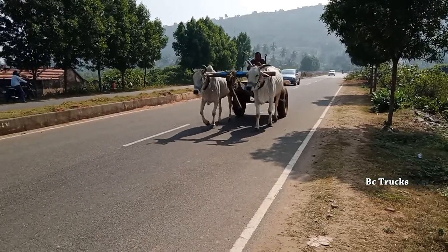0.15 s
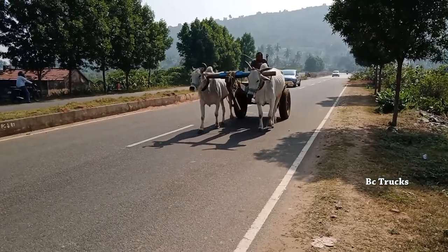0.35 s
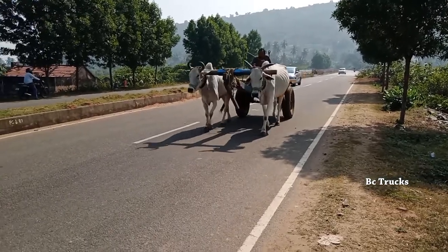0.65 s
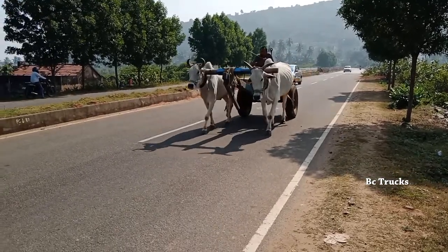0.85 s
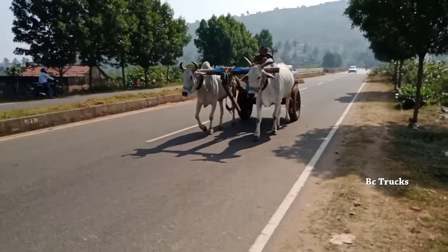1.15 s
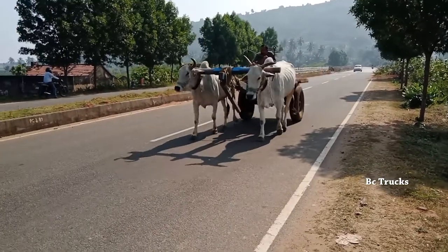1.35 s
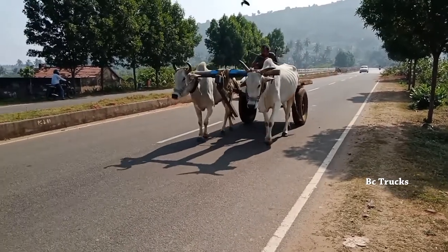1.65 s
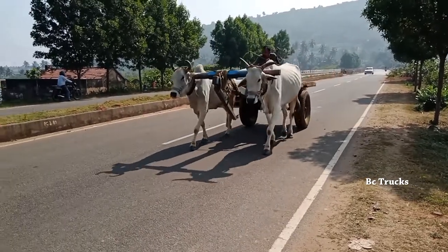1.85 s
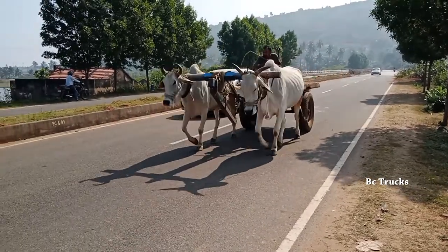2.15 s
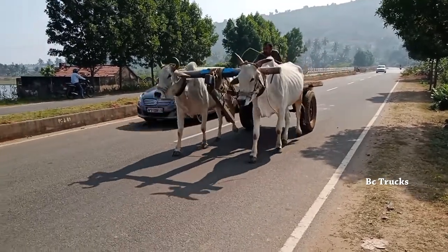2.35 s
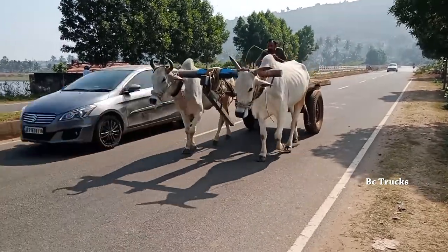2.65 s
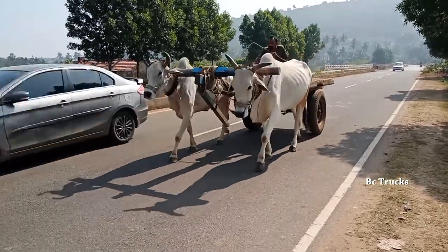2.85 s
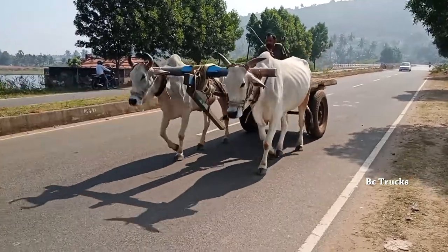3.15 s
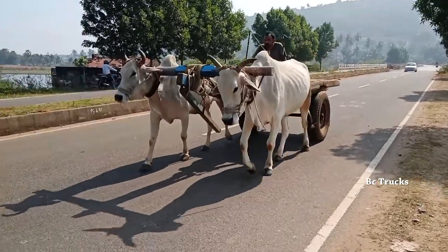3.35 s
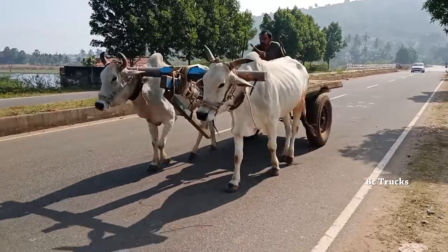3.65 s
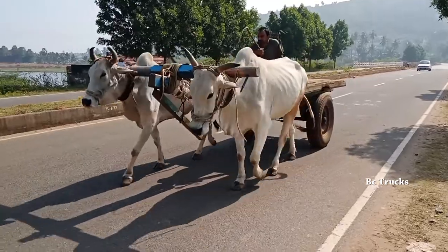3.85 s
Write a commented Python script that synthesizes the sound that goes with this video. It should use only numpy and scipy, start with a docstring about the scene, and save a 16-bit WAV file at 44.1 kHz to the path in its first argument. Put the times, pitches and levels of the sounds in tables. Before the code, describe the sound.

Ox hooves clack on a road, drawing a rumbling cart as a car rushes past.

```python
"""Two oxen draw a cart along a country highway towards a microphone on the verge as a car overtakes.
Each hoof impact excites a sharp crack, a dull knock and a spray of crushed grit; iron parts ring in
damped modes, thin squeaks fall in pitch, and the cart bed rumbles and bumps. The car's tyre roar is
directional: it swells from ahead, broadens alongside and leaves a hiss behind.
Far traffic and brief puffs of wind lie underneath."""
import sys
import numpy as np
from scipy import signal
from scipy.fft import rfft, irfft
from scipy.io import wavfile
from scipy.ndimage import uniform_filter1d

SR = 44100
rng = np.random.default_rng(int(sys.argv[2]) if len(sys.argv) > 2 else 0)


def dump(signal):
    """Clip the signal to [-1, 1] and save it as 16-bit WAV at the path in sys.argv[1]."""
    limited = np.clip(np.atleast_2d(signal).T, -1, 1)
    pcm = np.round(limited * 32767).astype(np.int16)
    wavfile.write(sys.argv[1], SR, pcm)


N = 176400

# hoof strikes and scuffs: start_s, crack_db, knock_db, grit_decay_s
HOOF_STRIKES = [(0.049, -46, -56, .014), (.064, -45, -46, .012), (.131, -53, -48, .016),
                (0.3, -40, -52, .012), (.308, -32.5, -43, 0.0057), (0.332, -48, -42.5, .04),
                (.361, -47, -54, .008), (.633, -45, -43, 0.013), (0.641, -52, -46, 0.032),
                (.763, -59, -51, .012), (.797, -32.5, -44, 0.0074), (.807, -55, -38, .014),
                (0.891, -40.5, -62, .01), (.899, -37, -60, .004), (0.91, -46, -46, 0.018),
                (0.955, -59, -44, .014), (1.120, -55, -52, 0.011), (1.146, -53, -63, .006),
                (1.169, -55, -47, .02), (1.184, -43, -34, 0.013), (1.222, -35.5, -48, 0.0081),
                (1.317, -29, -33.5, 0.0053), (1.325, -37, -44, .012), (1.441, -40.5, -51, 0.026),
                (1.475, -41, -40.5, 0.0066), (1.571, -54, -51, .006), (1.647, -36, -33.5, .008),
                (1.793, -30.5, -36, 0.0076), (1.802, -48, -37.5, 0.011), (2.052, -31, -38.5, .011),
                (2.209, -41, -44, .01), (2.236, -46, -47, 0.032), (2.326, -34.5, -35, .016),
                (2.346, -35.5, -33.5, 0.032), (2.630, -36, -40, 0.021), (2.812, -35, -30, 0.018),
                (2.821, -43, -28.5, .008), (2.922, -27, -34, 0.027), (2.974, -34, -44, .006),
                (3.014, -27.5, -47, 0.012), (3.229, -28, -29, 0.0071), (3.692, -32, -24.5, .02),
                (3.800, -30, -35, 0.027), (3.854, -28.5, -26.5, .014)]
# spectral shapes of the sharp crack and the dull knock: frequency_hz, relative_db
CRACK_SHAPE = [(1500, -60), (3500, -31), (6000, -3.5), (8500, 6), (11000, 2.5), (15000, -4.5)]
KNOCK_SHAPE = [(80, -5), (200, -24), (500, 8), (1400, 13), (2400, 8), (4000, 12.5), (6000, 6), (9000, 2),
               (15000, -9)]
# hooves sliding on the road: centre_s, half_length_s, level_db
HOOF_DRAGS = [(0.676, 0.033, -58), (0.937, 0.025, -58), (1.123, 0.016, -53.5), (1.22, 0.055, -54),
              (1.472, 0.03, -49.5), (1.54, 0.038, -63), (2.257, 0.05, -61), (2.403, 0.092, -48.5)]
# spectral shape of sliding friction: frequency_hz, relative_db
FRICTION_SHAPE = [(1200, -15), (3000, -3), (4000, 8.5), (4700, -4), (5300, 0), (6300, -4.5), (8000, 2),
                  (15000, -25)]
# clinks of iron: start_s, pitch_hz, level_db
IRON_CLINKS = [(.049, 11650, -27), (0.049, 6800, -40), (0.615, 7450, -25), (1.285, 11500, -39),
               (1.293, 11000, -36), (1.77, 7450, -20), (1.821, 11800, -39), (1.852, 15100, -35),
               (1.888, 11100, -27), (2.653, 7480, -21.5), (2.925, 7460, -21)]
# modes of the iron: frequency_ratio, relative_db, decay_s
IRON_MODES = [(1.001, 1, 0.0026), (1.34, -25, .008)]
# thin squeaks: start_s, length_s, from_hz, to_hz, level_db
SQUEAK_GLIDES = [(0.18, .04, 7200, 5800, -60), (0.618, 0.1, 7400, 5920, -52),
                 (1.157, 0.033, 6900, 6630, -51), (3.687, 0.054, 6140, 5930, -33.5)]
# rumble of wheels and cart bed, before the approach gain: frequency_hz, density_db
RUMBLE_SPECTRUM = [(30, -97), (75, -75), (160, -74), (260, -86.5), (600, -105), (2000, -130)]
# bumps of the cart bed: start_s, pitch_hz, level_db
BED_BUMPS = [(1.225, 160, -41), (1.40, 171, -34.5), (1.766, 185, -33.5), (1.87, 89, -35),
             (1.961, 290, -32.5), (2.11, 200, -37), (2.281, 260, -30), (2.63, 228.8, -25.5),
             (2.72, 216, -27), (3.43, 262, -26), (3.719, 155, -27)]
# tyre and engine noise from the car's front, side and rear: frequency_hz, density_db
FRONT_SPECTRUM = [(60, -78.5), (150, -76.5), (280, -67.5), (430, -79.5), (570, -69.5), (830, -69),
                  (1060, -76), (1250, -73), (1520, -66.5), (1740, -77), (1980, -71.5), (2220, -82),
                  (2580, -81.5), (2900, -84), (4000, -84.5), (4700, -101.5), (6000, -96.5), (9000, -103),
                  (15000, -119)]
SIDE_SPECTRUM = [(50, -66), (110, -62), (170, -63), (290, -55.5), (480, -69.5), (850, -63.5), (1250, -63.5),
                 (1600, -60.5), (2000, -66.5), (2750, -65), (3200, -67), (4500, -70), (7200, -79.5),
                 (11000, -84), (15000, -105)]
REAR_SPECTRUM = [(60, -95.5), (240, -58.5), (380, -63), (560, -56.5), (900, -63), (1250, -59), (1450, -59),
                 (1750, -56), (2500, -68.5), (3700, -62), (6000, -68.5), (8000, -71.5), (11500, -72.5),
                 (15000, -85)]
# gain of the forward roar, stepping up as the car clears the cart: time_s, gain_db
FRONT_GAIN = [(0, -17.5), (.55, -16), (.88, -11.5), (1.15, -9.5), (1.5, -6), (1.8, -0.5), (2.06, 0),
              (2.16, 4), (2.33, 1.5), (2.52, 4.5), (2.8, 2.5), (3.1, -15), (4, -21)]
# surges of tread hum, the last one at a lower pitch: centre_s, half_length_s, pitch_hz, level_db
TREAD_SURGES = [(1.1, 0.27, 1394, -49), (2.18, 0.096, 1434, -42), (2.5, 0.088, 1434, -37.5),
                (3.555, 0.4, 1260, -42)]
# far traffic: frequency_hz, density_db
TRAFFIC_SPECTRUM = [(50, -69), (150, -81.5), (300, -89), (470, -94), (750, -91.5), (1050, -104),
                    (1300, -77), (1480, -81.5), (1720, -97), (1980, -75.5), (2200, -91.5), (2480, -81),
                    (2900, -97), (4000, -92), (4800, -106), (7200, -104), (10000, -112), (15000, -118)]
# puffs of wind: centre_s, half_length_s, level_db
WIND_PUFFS = [(0.15, 0.041, -41), (0.204, 0.034, -35.5), (0.308, 0.035, -37)]
# spectral shape of wind on the microphone: frequency_hz, relative_db
WIND_SHAPE = [(30, 11), (80, 9), (160, 5), (230, -11.5), (400, -40), (2000, -77)]
# response of the microphone port: frequency_hz, gain_db
PORT_RESPONSE = [(25, -32), (45, -26.5), (80, -8.5), (200, -0.5), (1100, 0), (1250, 8.5), (1450, 2),
                 (2000, 1), (2370, 7.5), (3050, -2.5), (3700, -5), (4150, -3), (4700, -8.5), (5500, 0),
                 (6050, 6), (6600, -0.5), (7250, 0.5), (8000, -9.5), (11500, -10), (13700, -13), (15100, 1)]

CONTACT_S, CRACK_DECAY_S, KNOCK_DECAY_S = 0.00077, 0.0035, 0.01
GRIT_DB, GRIT_FLICKER_DB, GRIT_FLICKER_PER_S = -6, 4.5, 110  # grit level is relative to the crack
GRAINS_PER_S, GRAIN_SPREAD_DB, GRAIN_RING_S = 5200, 5.5, 0.0007
HARNESS_DB, RUSTLE_DB, RUSTLE_PER_S = -62.5, 3, 45
CLINK_RISE_S, CLINK_JITTER, SCRAPE_DB, SCRAPE_DECAY_S = 0.0018, 0.022, -14, 0.0055
SQUEAK_WIDTH_HZ, TREAD_WIDTH_HZ = 450, 130
RUMBLE_LUMPS_DB, CRACKLE_DB, CRACKLE_UNEVEN_DB, APPROACH_DB_PER_S = 5.5, -73, 4, 0.5
BUMP_RISE_S, BUMP_DECAY_S, BUMP_JITTER = 0.0065, 0.023, 0.2017
SPEED_M_S, PASSES_S, LANE_M = 15.4, 3.138, 7.65  # car speed; time and distance of closest approach
SIDE_LEAD_M = 1.14  # the front tyres and the engine pass first
SIDE_FOCUS, REAR_FOCUS, REAR_FALLOFF = 3.39, 0.67, 0.82  # exponents: two beam shapes, one distance law
SWELL_DB, FLUTTER_DB = 1.22, 1.28  # slow and quick unevenness of road noise
SCATTER_DB, SCATTER_DELAY_S, SCATTER_DECAY_S = -10, 0.0082, 0.018


def hooves(t, stones):
    """Impact excitation: each brief contact gives a broadband crack, a knock and a spray of grit."""
    crack, grit, knock = np.zeros((3, N))
    for start, crack_db, knock_db, grit_decay_s in HOOF_STRIKES:
        settle = 1 - fade(t, start, CONTACT_S)
        crack += undb(crack_db) * settle * fade(t, start, CRACK_DECAY_S)
        grit += undb(crack_db + GRIT_DB) * settle * fade(t, start, grit_decay_s)
        knock += undb(knock_db) * settle * fade(t, start, KNOCK_DECAY_S)
    crack_noise = flicker(rng.standard_normal(N))
    knock_noise = flicker(rng.standard_normal(N))
    sharp = colour(crack * crack_noise + grit * stones, CRACK_SHAPE, keep_power=True)
    dull = colour(knock * knock_noise, KNOCK_SHAPE, keep_power=True)
    return sharp + dull


def gravel():
    """Superposition of random impacts: crushed stones of uneven size ring briefly at many pitches."""
    pitches = np.linspace(1500, 15500, 40)
    age, out = np.arange(256) / SR, np.zeros(N)
    for hz in pitches:
        hits = np.flatnonzero(rng.random(N) < GRAINS_PER_S / len(pitches) / SR)
        sizes, ticks = rng.standard_normal(N)[hits], np.zeros(N)
        ticks[hits] = np.sign(sizes) * undb(GRAIN_SPREAD_DB * np.abs(sizes))
        ring = np.exp(-age / GRAIN_RING_S) * np.sin(2 * np.pi * hz * age)
        out += signal.oaconvolve(ticks, ring)[:N]
    return flicker(unit(out))


def friction(t, stones):
    """Friction noise: sliding hooves swell over the fitful rustle of rope and harness."""
    harness = undb(HARNESS_DB + RUSTLE_DB * walk(20)) * np.minimum(t, 2)  # grows as the oxen near
    texture = flicker(stones, RUSTLE_DB, RUSTLE_PER_S)
    return colour((swells(t, HOOF_DRAGS) + harness) * texture, FRICTION_SHAPE, keep_power=True)


def clinks(t):
    """Damped modal vibration: small iron parts scrape and ring roughly for a few milliseconds."""
    out = np.zeros(N)
    scrape = colour(rng.standard_normal(N), CRACK_SHAPE, keep_power=True)
    clock = np.cumsum(1 + CLINK_JITTER * walk(2000)) / SR
    for start, hz, db in IRON_CLINKS:
        rise = 1 - fade(t, start, CLINK_RISE_S)
        out += undb(db + SCRAPE_DB) * rise * fade(t, start, SCRAPE_DECAY_S) * scrape
        for ratio, mode_db, decay_s in IRON_MODES:
            mode = np.sin(2 * np.pi * hz * ratio * clock)
            out += undb(db + mode_db) * rise * fade(t, start, decay_s) * mode
    return out


def squeaks(t):
    """Random modulation widens each falling tone into a rough, narrow whistle."""
    out, rough = np.zeros(N), roughness(SQUEAK_WIDTH_HZ)
    for start, length, from_hz, to_hz, db in SQUEAK_GLIDES:
        progress = np.clip((t - start) / length, 0, 1)
        phase = 2 * np.pi * np.cumsum(from_hz + (to_hz - from_hz) * progress) / SR
        arch = np.sqrt(progress * (1 - progress))
        out += undb(db) * arch * np.real(rough * np.exp(1j * phase))
    return out


def wheels(t, stones):
    """Rolling noise: the cart rumbles and its tyres crackle over grit, louder as it nears."""
    rumble = road_noise(RUMBLE_SPECTRUM) * undb(RUMBLE_LUMPS_DB * walk(24))
    crackle = colour(stones, CRACK_SHAPE, keep_power=True)
    crackle *= undb(CRACKLE_DB + CRACKLE_UNEVEN_DB * walk(34))
    approach_gain = undb(APPROACH_DB_PER_S * (t - 12))
    return (rumble + crackle) * approach_gain


def bumps(t):
    """Damped oscillation: the cart bed thuds for a few cycles of unsteady pitch."""
    out = np.zeros(N)
    clock = np.cumsum(1 + BUMP_JITTER * walk(200)) / SR
    for start, hz, db in BED_BUMPS:
        envelope = (1 - fade(t, start, BUMP_RISE_S)) * fade(t, start, BUMP_DECAY_S)
        out += undb(db) * envelope * np.sin(2 * np.pi * hz * clock)
    return out


def car(t):
    """Directivity of a moving source: forward, side and rear beams of tyre roar sweep by in turn."""
    along = SPEED_M_S * (t - PASSES_S)
    distance = np.hypot(along, LANE_M)
    nearness, rear_cosine = LANE_M / distance, np.maximum(along / distance, 0)
    side_cosine = LANE_M / np.hypot(along + SIDE_LEAD_M, LANE_M)
    front = road_noise(FRONT_SPECTRUM) * undb(np.interp(t, *np.array(FRONT_GAIN).T))
    side = road_noise(SIDE_SPECTRUM) * side_cosine ** SIDE_FOCUS
    rear = road_noise(REAR_SPECTRUM) * rear_cosine ** REAR_FOCUS * nearness ** REAR_FALLOFF
    return front + side + rear


def tread(t):
    """Narrow-band noise: the car's tyre tread hums in surges about a pitch."""
    out, rough = np.zeros(N), roughness(TREAD_WIDTH_HZ)
    for centre, half, hz, db in TREAD_SURGES:
        hum = np.real(rough * np.exp(2j * np.pi * hz * t))
        out += swells(t, [(centre, half, db)]) * hum
    return out


def roadside_scatter(t):
    """Diffuse reflection: cart, kerb and trees give a short, delayed impulse response."""
    response = rng.standard_normal(N) * fade(t, SCATTER_DELAY_S, SCATTER_DECAY_S)
    return undb(SCATTER_DB) * response / np.linalg.norm(response)


def far_traffic():
    """Incoherent sources: distant vehicles merge into a nearly steady noise."""
    return road_noise(TRAFFIC_SPECTRUM)


def wind(t):
    """Turbulent pressure: soft, low puffs on the microphone."""
    return swells(t, WIND_PUFFS) * colour(rng.standard_normal(N), WIND_SHAPE, keep_power=True)


def road_noise(spectrum):
    """Filtered noise of a given spectral density, its level wavering slowly and quickly."""
    noise = colour(rng.standard_normal(N) * np.sqrt(SR / 2), spectrum)
    return noise * undb(SWELL_DB * walk(5) + FLUTTER_DB * walk(40))


def flicker(x, depth_db=GRIT_FLICKER_DB, rate=GRIT_FLICKER_PER_S):
    """Independent amplitude modulation of twelve bands makes the treble flicker."""
    hz, spectrum = np.fft.rfftfreq(N, 1 / SR), rfft(x)
    centres = np.linspace(2000, 16000, 12)
    bands = [irfft(spectrum * np.interp(hz, centres, share), N) for share in np.eye(len(centres))]
    return unit(sum(band * undb(depth_db * np.tanh(walk(rate) / 2) * 2) for band in bands))


def colour(x, points, keep_power=False):
    """Minimum-phase filter through (Hz, dB) points; keep_power sets its rms gain to 1."""
    size = 2 * N
    hz, db = np.array(points, float).T
    gain = undb(np.interp(np.log(np.fft.rfftfreq(size, 1 / SR) + 1), np.log(hz), db))
    cepstrum = irfft(np.log(unit(gain) if keep_power else gain))
    cepstrum[1:N] *= 2  # folding the cepstrum makes the filter causal
    cepstrum[N + 1:] = 0
    return irfft(rfft(x, size) * np.exp(rfft(cepstrum)))[:N]


def roughness(width_hz):
    """Complex random envelope that spreads a tone into a band."""
    return walk(width_hz * 2) + 1j * walk(width_hz * 2)


def walk(rate):
    """Smoothed random motion of rms 1, with about rate new values a second."""
    hold = max(int(SR / rate), 1)
    steps = np.repeat(rng.standard_normal(N // hold + 1), hold)
    return unit(uniform_filter1d(uniform_filter1d(steps, hold), hold)[:N])


def swells(t, rows):
    """Sum of Gaussian envelopes from rows of centre_s, half_length_s, level_db."""
    return sum(undb(db) * np.exp(-((t - centre) / half) ** 2) for centre, half, db in rows)


def fade(t, start, decay_s):
    """Sudden onset, exponential decay."""
    return (t >= start) * np.exp(-np.maximum(t - start, 0) / decay_s)


def undb(db):
    """Decibels to amplitude gain."""
    return 10 ** (np.asarray(db) / 20)


def unit(x):
    """Scale to rms 1."""
    return x / np.sqrt(np.mean(x ** 2))


def scene():
    """Superposition: the ox cart and its reflections add to the car, far traffic and wind."""
    t = np.arange(N) / SR
    road = car(t) + tread(t) + far_traffic() + wind(t)
    scatter = roadside_scatter(t)
    underfoot, loose = gravel(), gravel()
    cart = hooves(t, underfoot) + friction(t, loose) + wheels(t, loose) + bumps(t)
    cart += clinks(t) + squeaks(t)
    reflections = signal.fftconvolve(cart, scatter)[:N]
    return (cart + reflections + road)[None]


def record(dry):
    """Linear filtering: the microphone port colours the sound and a steep low-pass cuts the top."""
    low_pass = signal.ellip(10, .2, 70, 15550, fs=SR, output="sos")
    return signal.sosfilt(low_pass, colour(dry[0], PORT_RESPONSE))[None]


dry = scene()
out = record(dry)
dump(out)
```